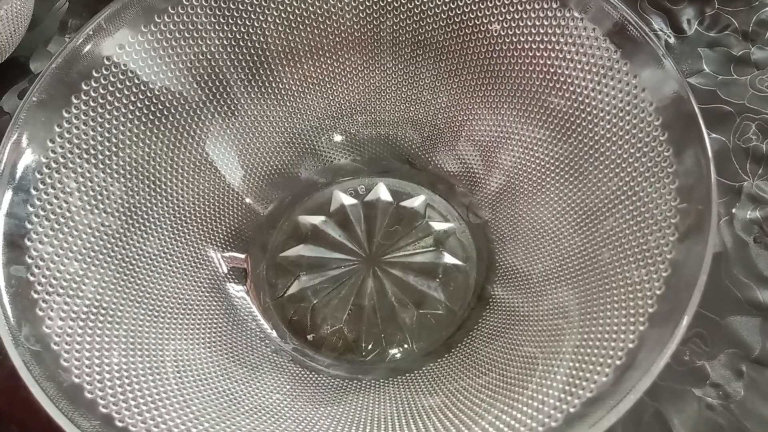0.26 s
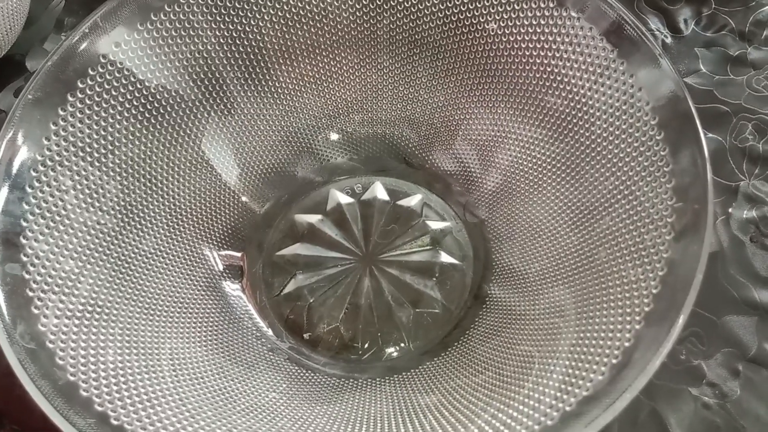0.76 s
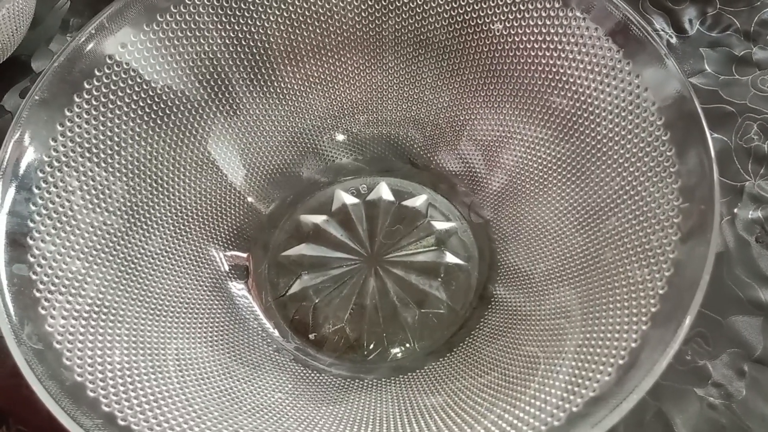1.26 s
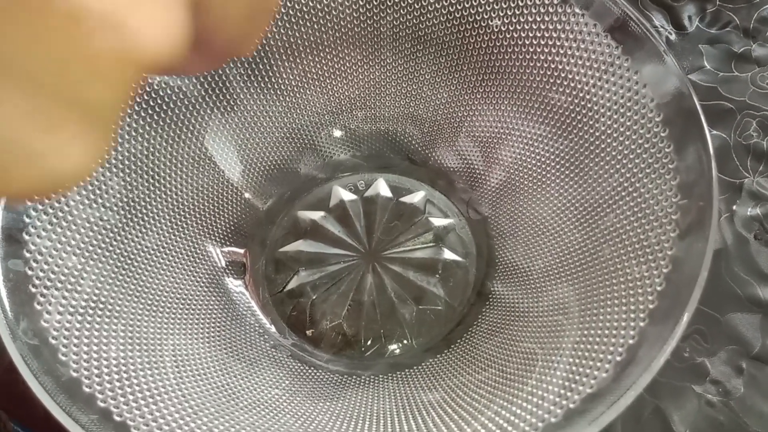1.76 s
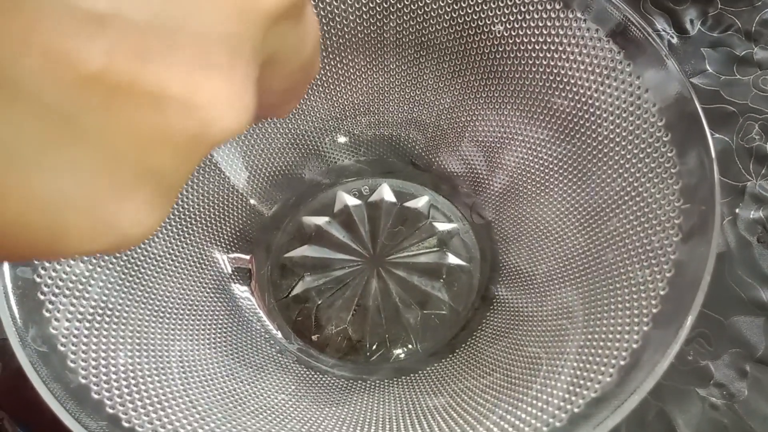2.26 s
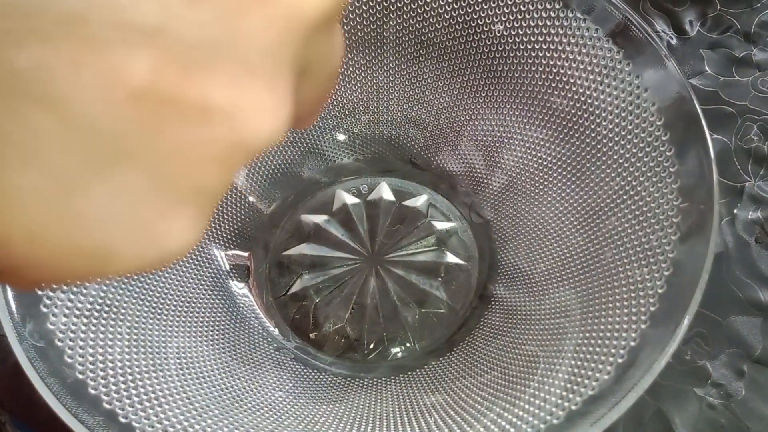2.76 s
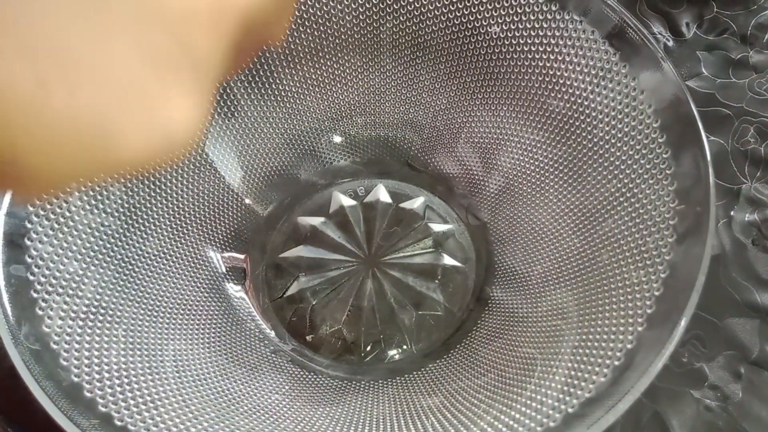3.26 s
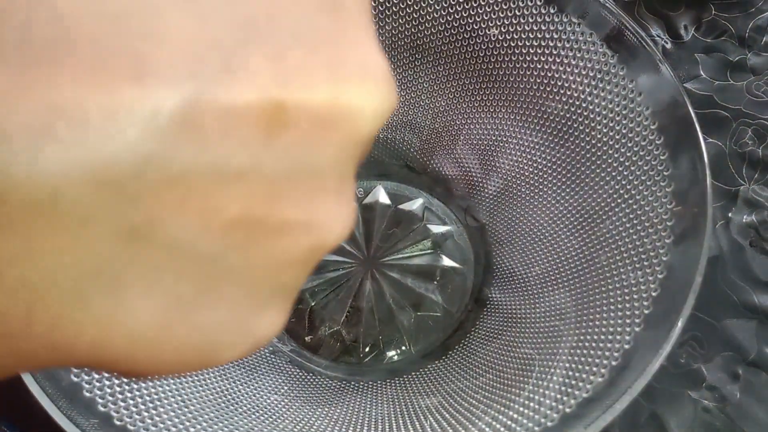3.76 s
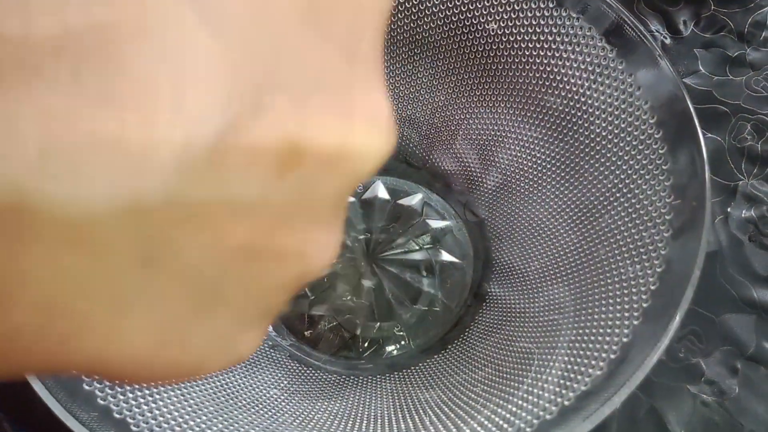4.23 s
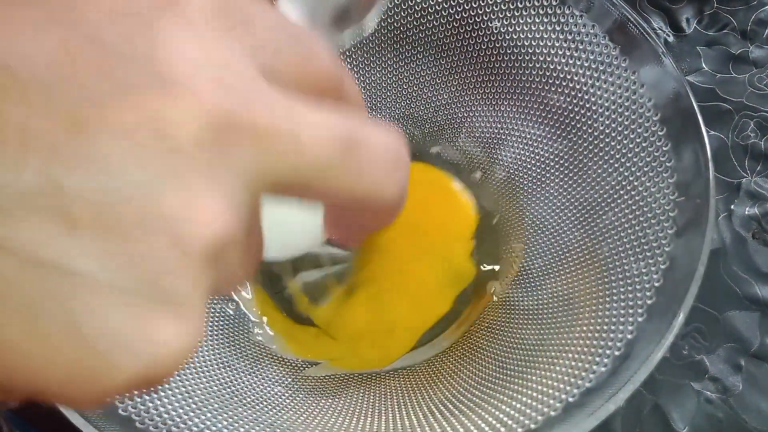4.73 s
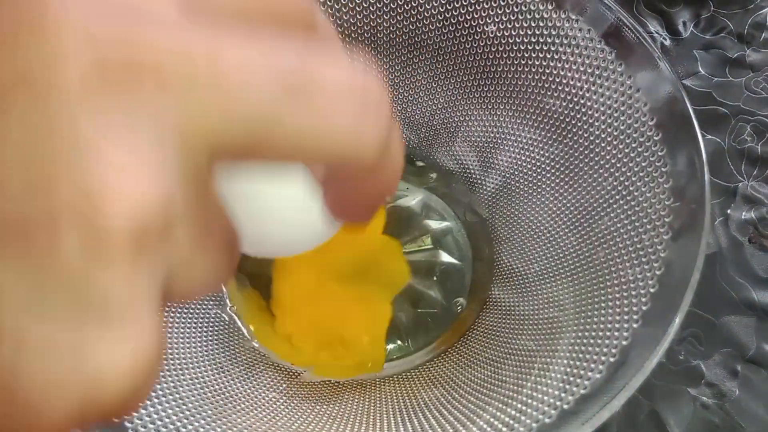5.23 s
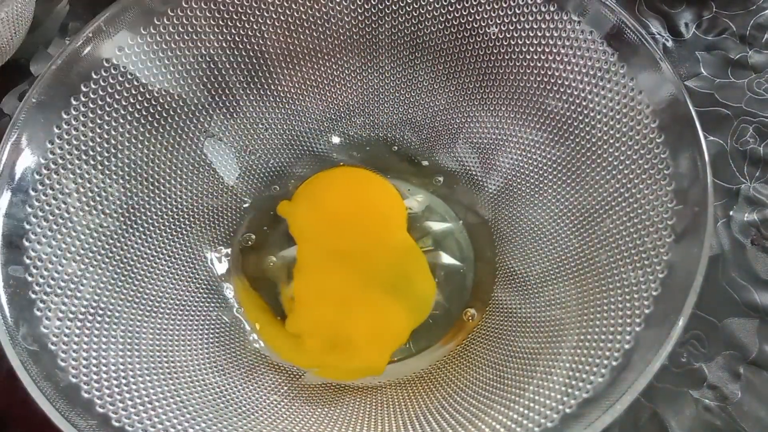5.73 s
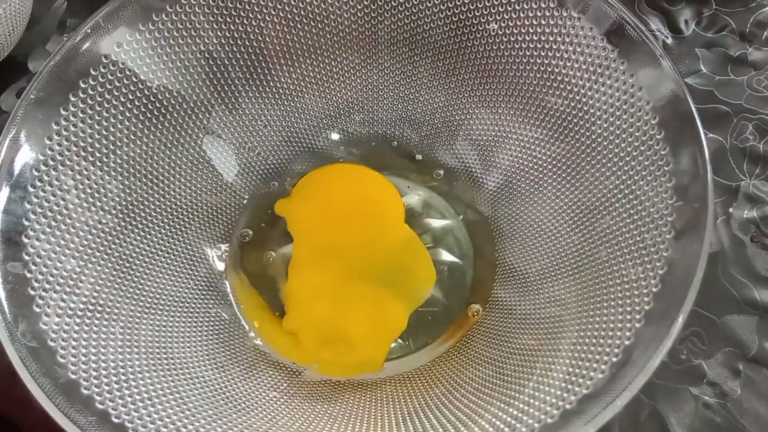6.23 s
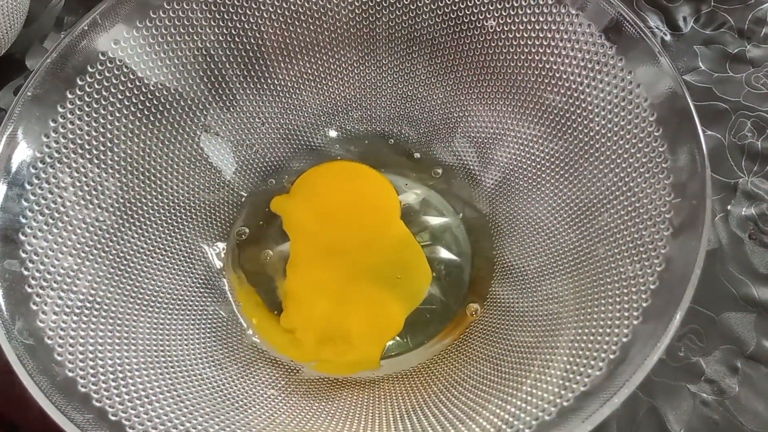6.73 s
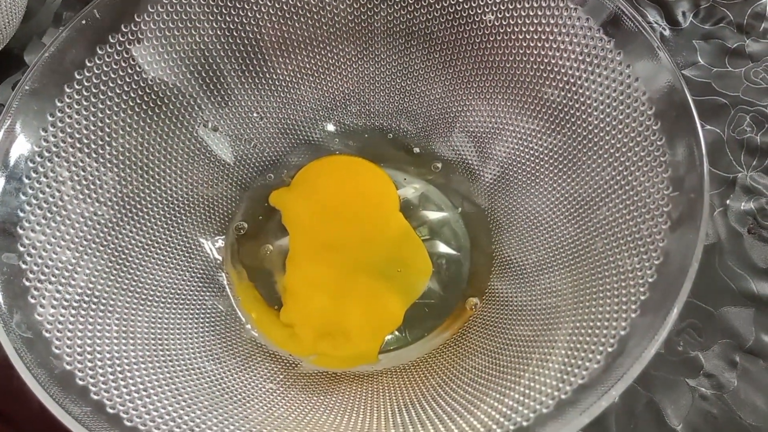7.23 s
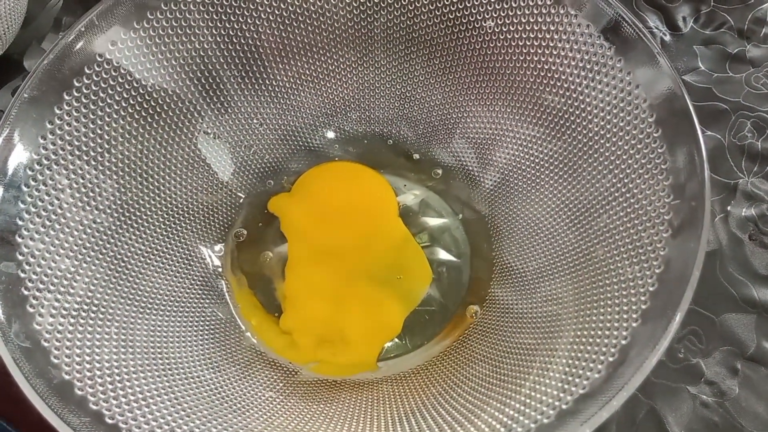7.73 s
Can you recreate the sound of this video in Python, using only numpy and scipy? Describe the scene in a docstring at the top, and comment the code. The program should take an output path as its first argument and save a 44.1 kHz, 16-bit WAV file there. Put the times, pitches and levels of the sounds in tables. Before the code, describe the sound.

A close microphone above a glass bowl catches an egg being opened: a crisp opening tick, tiny brittle cracks, faint hand rumble, then gentle wet plops. Afterwards the shell crackles under squeezing fingers and is put down with a dry, light, rocking clatter. Slight room echo surrounds it, over hollow, uneven background noise with a wavering drone and thin high hiss.

```python
"""Egg opened over a glass bowl

Shell ticks and snaps: noise cracks, ringing bands and a faint song of the bowl; squeezed or rocking shell
crackles in dense clicks. Contents plop softly as damped rising sines; the empty shell is set down with knocks
of damped modes. Hands rumble faintly near the microphone; background noise flickers in patches under a thin
hiss, all filtered noise.
"""
import sys
import numpy as np
from scipy import signal
from scipy.fft import rfft, irfft, next_fast_len
from scipy.io import wavfile
from scipy.ndimage import map_coordinates

SR = 44100
rng = np.random.default_rng(int(sys.argv[2]) if len(sys.argv) > 2 else 0)


def master(y):
    """Save y as 16-bit WAV."""
    cut = np.clip(np.atleast_2d(y).T, -1, 1)
    pcm = np.round(cut * 32767)  # scale
    wavfile.write(sys.argv[1], SR, pcm.astype(np.int16))


N = 352182

# Shell snaps. Each row: start in seconds, ring pitch in Hz, levels of body, ring and splinter in dB.
SNAPS = [(0.0066, 6470, -31.5, -24.5, -28), (1.433, 7300, -63, -47, -46.5), (1.506, 6850, -59, -46.5, -42),
         (1.718, 6330, -54, -35, -37), (2.077, 7000, -68, -55, -47), (2.0895, 7000, -68, -55, -51),
         (2.8255, 6500, -68, -38.5, -43), (2.8375, 5900, -64, -39.5, -34), (2.8512, 6700, -68, -56, -51),
         (2.9417, 7000, -66, -29, -29.5), (2.9512, 5900, -68, -52, -47), (3.0050, 7000, -71, -54, -43),
         (3.3045, 6860, -65, -53, -43.5), (3.3145, 6800, -68, -56, -44), (3.3332, 6500, -59, -42, -43),
         (3.5940, 7600, -70, -42, -40.5), (4.002, 7730, -68, -56, -46), (4.025, 7300, -72, -60, -52),
         (4.0419, 5960, -71, -29, -25), (4.0565, 7150, -61, -48, -37.5), (4.063, 5770, -54, -54, -45),
         (4.11, 6860, -60, -43, -40), (4.232, 6000, -69, -47.5, -69), (4.6606, 6440, -62, -45.5, -53),
         (5.9998, 7130, -52, -36.5, -45), (6.009, 7000, -68, -52, -56), (6.022, 6850, -64, -46, -49),
         (6.0786, 6780, -56, -25, -40), (6.183, 6900, -59, -49, -44), (6.264, 6960, -66, -57, -57),
         (6.375, 7000, -55, -52, -61), (6.655, 5960, -75, -65, -54), (7.331, 5800, -54, -52, -39),
         (7.37, 6000, -53, -56, -51)]
# Splinter spectrum. Each row: frequency in Hz, density in dB per Hz.
SPLINTER_SPECTRUM = [(300, -37), (3000, -20), (4300, -25), (5400, 0.5), (7400, -0.5), (8250, 2.5),
                     (9500, 3), (12300, 2.5), (14400, 8.5), (15300, 7), (16000, -8), (16800, -28)]
# Glass resonances after a snap. Each row: centre in Hz, half-width in Hz, level in dB re splinter.
BOWL_BANDS = [(5160, 130, -22.5), (5750, 180, -15.5)]
BOWL_T60_S = 0.47
SPLIT_ATTACK_S, SPLIT_T60_S, RING_T60_S = 0.0001, 0.008, 0.007
# A crack runs on in small jumps: mean gap, level under the snap, loss per jump, spread.
AFTER_GAP_S, AFTER_LOSS_DB, AFTER_STEP_DB, AFTER_SPREAD_DB = 0.008, 20, 2.5, 3.5

# Shell crackles. Each row: start in seconds, click level in dB, body level in dB, length in seconds.
CRACKLES = [(2.082, -65, -65, 0.056), (2.948, -61, -66, 0.022), (3.336, -52, -66, 0.012),
            (6.054, -48, -61, 0.042), (6.07, -39.5, -44, 0.011), (6.079, -70, -51, 0.042),
            (6.166, -42.5, -49, 0.038), (7.242, -63, -49, 0.02), (7.273, -50, -41.5, 0.025),
            (7.292, -49, -44.5, 0.043), (7.336, -55, -47, 0.03), (7.953, -64.5, -54, 0.049)]
# Treble of a crackle. Each row: frequency in Hz, density in dB per Hz.
GRIT_SPECTRUM = [(3000, -14), (4300, -21), (5050, 4), (5700, 3), (6500, 13), (7300, 12), (8300, 3),
                 (12000, -4), (14500, 6), (15400, 3), (16000, -30)]
# Body of a crackle. Each row: frequency in Hz, density in dB per Hz.
SCUFF_SPECTRUM = [(300, -27), (900, -8), (1400, 2.5), (2300, 1), (3400, -4), (4300, -22), (5100, 1.5),
                  (6500, -22), (12000, -47)]
# Fingers brushing the shell. Each row: start in seconds, length in seconds, level in dB.
BRUSHES = [(0.71, .15, -73), (0.87, .09, -75), (1.328, 0.13, -72), (1.476, 0.11, -65), (2.07, .11, -69),
           (2.21, 0.1, -73), (2.42, 0.085, -73)]
CLICK_SHARE = 0.2  # share of samples that hold a click
CLUMP_SPREAD_DB, CLUMP_S = 2, 0.003

# Low plops. Each row: start in seconds, peak level in dB, starting pitch in Hz.
PLOPS = [(4.486, -38.5, 93), (4.535, -43, 154), (4.572, -45, 158), (4.659, -33, 104), (4.687, -36, 112.5),
         (4.722, -46, 125), (4.792, -43, 85), (4.857, -36, 104), (4.868, -33, 133), (4.912, -41, 104),
         (5.059, -27, 112), (5.132, -48, 72)]
# Air popping in the egg white. Each row: start in seconds, level in dB, starting pitch in Hz.
BUBBLES = [(4.664, -24.5, 2580)]

# Shell set down on the counter. Each row: start in seconds, levels of thud, ring and clack in dB,
# pitch in Hz that the struck spot of the husk favours.
KNOCKS = [(7.2324, -44, -30.5, -32.5, 3600), (7.2675, -30, -25, -24, 1970), (7.2700, -55, -36, -32.5, 5600),
          (7.2759, -37.5, -46, -42, 700), (7.307, -42.5, -34, -38, 1400), (7.331, -44.5, -35.5, -35, 2330)]
# Counter modes. Each row: frequency in Hz, relative level in dB, t60 in seconds.
COUNTER_MODES = [(232, -4.5, 0.078), (352, -7, 0.056), (502, 3.5, 0.027), (600, 9, 0.023), (680, 5, 0.041)]
# Husk modes. Each row: frequency in Hz, relative level in dB, t60 in seconds.
HUSK_MODES = [(1030, 10.5, 0.026), (1380, 7, 0.025), (1970, -5, 0.016), (2360, -5, 0.025),
              (2970, -2, 0.022), (3570, -8, 0.021), (5560, -8, 0.026)]
# Clack spectrum. Each row: frequency in Hz, density in dB per Hz.
CLACK_SPECTRUM = [(400, -19), (1200, -3), (3000, -4.5), (4300, -6), (4950, 3.5), (5700, 5.5), (6900, 3),
                  (8300, -8), (12000, 0.5), (15200, 4), (16000, -22)]
SPOT_LIFT_DB, SPOT_HALF_WIDTH_HZ = 13, 160

# Hand movements. Each row: start in seconds, length in seconds, level in dB.
MOVES = [(0.784, 0.099, -58), (1.203, 0.21, -58), (1.837, 0.16, -62), (2.696, 0.027, -61),
         (2.967, 0.14, -47), (3.26, 0.064, -49.5), (3.948, 0.13, -56), (4.233, 0.43, -57),
         (4.627, 0.31, -52), (5.098, 0.33, -57), (5.907, 0.28, -56), (6.386, 0.035, -61), (7.959, .04, -47)]
# Dull bumps of the hands. Each row: start in seconds, peak level in dB, starting pitch in Hz.
BUMPS = [(3.003, -36, 88.5), (3.055, -44, 75), (3.09, -36, 105), (3.113, -35, 115), (3.259, -41, 80),
         (6.109, -48, 70), (6.158, -41, 75), (6.174, -36.5, 95)]
# Hand rumble spectrum. Each row: frequency in Hz, density in dB per Hz.
RUMBLE_SPECTRUM = [(20, -50), (32, -1), (48, -1.5), (70, 5.5), (110, 4), (205, -4.5), (280, -19),
                   (600, -78)]
MOVE_RISE_S, MOVE_T60_S, RESTING_DB = 0.024, 0.31, -80

# Background noise level. Each row: time in seconds, level in dB before a 0.98 dB cut.
FLOOR_LEVEL = [(0.1, -47.5), (2.3, -48), (2.8, -46), (3.5, -47.5), (4.9, -47), (6.2, -47.5), (6.4, -49.5),
               (7.9, -48.5)]
# Background noise spectrum. Each row: frequency in Hz, density in dB per Hz.
FLOOR_SPECTRUM = [(40, -54), (90, -20.5), (165, -4), (255, -8.5), (320, -8.5), (440, -3), (560, -16.5),
                  (680, -16), (1100, -7.5), (1270, -11), (2000, -4.5), (3100, -9), (3600, -18),
                  (4100, -32.5), (6000, -62)]
# Background noise resonances. Each row: centre in Hz, width in Hz, lift in dB.
FLOOR_RESONANCES = [(822.5, 204, 19), (1072, 43, 8), (1499, 298, 12), (2670, 81, -7)]
# Strong hollow swells. Each row: middle in seconds, level in dB before a 4 dB cut, pitch in Hz.
SWELLS = [(0.178, -47.5, 396), (1.771, -41.5, 331), (1.94, -45.5, 364), (2.67, -49, 734),
          (3.02, -43.5, 329), (3.559, -44.5, 345), (3.679, -44.5, 320), (4.275, -53, 755), (4.48, -47, 423),
          (5.251, -49.5, 358), (5.389, -47, 435), (5.62, -47, 430), (5.79, -48, 313), (6.48, -50, 503),
          (6.83, -46, 323), (6.96, -47, 170), (7.009, -46, 322), (7.19, -42.5, 372), (7.519, -50, 171)]
# Hiss spectrum. Each row: frequency in Hz, density in dB per Hz.
HISS_SPECTRUM = [(2350, 0), (4000, -90), (4210, -15), (4690, -9.5), (5170, -3.5), (5670, 1.5), (6040, 1.5),
                 (6540, 10.5), (7130, 7), (8370, -7.5), (10200, -12), (11100, -19.5), (13500, -13.5),
                 (14700, -11), (15700, -12)]
SWELL_SIGMA_S = 0.024
MURK_DB, MURK_SPREAD_DB, MURK_KNOTS_PER_S = -68, 6.5, 12  # weak random swells
DRONE_WAVER_DB, DRONE_DRIFT_HZ, DRONE_DRIFT_KNOTS_PER_S = 2.5, 34.92, 9
HISS_DB, HISS_TOP_HZ = -59, 15650

# Kitchen decay. Each row: frequency in Hz, t60 in seconds.
KITCHEN_T60 = [(200, 0.23), (1500, 1), (6000, 0.44), (15000, 0.38)]
LOW_CUT_HZ, TOP_HZ = 46.6, 16800


def shell():
    """Each fracture rings the shell briefly and throws a bright tick; the bowl sings faintly after it."""
    out, t = np.zeros(N), np.arange(SR // 3) / SR
    for start_s, ring_hz, body_db, ring_db, splinter_db in SNAPS:
        body = amp(body_db) * burst(band(2790, 140), fade(t, attack_s=0.00054, t60_s=0.0077))
        ring = amp(ring_db) * crack(band(ring_hz, 700), fade(t, SPLIT_ATTACK_S, RING_T60_S))
        # short fracture, then smaller splinters
        split = fade(t, SPLIT_ATTACK_S, SPLIT_T60_S) + 0.18 * fade(t, attack_s=0.00092, t60_s=0.034)
        splinter = amp(splinter_db) * crack(shaped(SPLINTER_SPECTRUM), split)
        snap = body + ring + splinter
        for hz, half_width_hz, db in BOWL_BANDS:
            song = burst(band(hz, half_width_hz), fade(t, attack_s=0.0015, t60_s=BOWL_T60_S))
            snap += amp(splinter_db + db) * song
        delays_s = np.cumsum(AFTER_GAP_S * (0.21 + 1.6 * rng.random(size=5)))
        for k, delay_s in enumerate(delays_s):
            jump_db = splinter_db - AFTER_LOSS_DB - AFTER_STEP_DB * k + rng.normal(0, AFTER_SPREAD_DB)
            add(snap, delay_s, amp(jump_db) * crack(shaped(SPLINTER_SPECTRUM), split[:SR // 100]))
        add(out, start_s, in_kitchen(snap, wet_db=-16.0))
    return out


def crackle():
    """Squeezed or rocking shell crackles in tiny bright clicks over a duller scuff; fingers brush it."""
    out = np.zeros(N)
    for start_s, click_db, body_db, length_s in CRACKLES:
        grit = amp(click_db) * clicking(shaped(GRIT_SPECTRUM), length_s)
        scuff = amp(body_db) * clicking(shaped(SCUFF_SPECTRUM), length_s)
        add(out, start_s, in_kitchen(grit + scuff, wet_db=-6.5))
    for start_s, length_s, db in BRUSHES:
        add(out, start_s, amp(db) * clicking(band(13900, 1600), length_s))
    return out


def clicking(gain, length_s):
    """A swell of dense tiny clicks in uneven clumps, rms 1."""
    size = int(length_s * SR)
    clumps = np.repeat(rng.standard_normal(size), int(CLUMP_S * SR))[:size]
    clicks = rng.laplace(size=size) * (rng.random(size) < CLICK_SHARE)
    clicks *= amp(CLUMP_SPREAD_DB * np.clip(clumps, -1.5, 1.5))
    return unit(filtered(clicks * signal.windows.tukey(size, 0.8), gain))


def contents():
    """White and yolk land in low plops; a trapped bubble pops as a short rising sine."""
    out, t = thumps(PLOPS), np.arange(SR // 5) / SR
    for start_s, db, hz in BUBBLES:
        tone = np.sin(2 * np.pi * hz * t * (1 + 0.5 * t))
        pop = amp(db) * tone * fade(t, attack_s=0.0023, t60_s=0.026)
        add(out, start_s, in_kitchen(pop, wet_db=-13))
    return out


def thumps(rows):
    """Soft heavy contacts: each is one low, heavily damped push that stiffens as it presses."""
    out, t = np.zeros(N), np.arange(SR // 5) / SR
    for start_s, peak_db, hz in rows:
        envelope = fade(t, attack_s=0.0037, t60_s=0.059) ** 2  # squaring halves the decay time
        push = -np.sin(2 * np.pi * hz * t * (1 + 9 * t)) * envelope
        add(out, start_s, amp(peak_db) * push / np.abs(push).max())
    return out


def knocks():
    """The empty shell lands and rocks: counter thud, dry clack, husk modes weighted by the struck spot."""
    out, t = np.zeros(N), np.arange(SR // 3) / SR
    for start_s, thud_db, ring_db, clack_db, spot_hz in KNOCKS:
        thud = amp(thud_db - 1.5) * burst(band(218, 60), fade(t, attack_s=0.002, t60_s=0.31))
        counter = amp(thud_db + 1.5) * ringing(COUNTER_MODES, t)
        spot = band(spot_hz, SPOT_HALF_WIDTH_HZ)
        modes = [(hz, db + SPOT_LIFT_DB * spot(hz), t60_s) for hz, db, t60_s in HUSK_MODES]
        husk = amp(ring_db) * ringing(modes, t)
        clack = amp(clack_db) * burst(shaped(CLACK_SPECTRUM), fade(t, attack_s=0.00072, t60_s=0.016))
        add(out, start_s, in_kitchen(thud + counter + husk, wet_db=-10))
        add(out, start_s, in_kitchen(clack, wet_db=-14.5))
    return out


def ringing(modes, t):
    """Damped modes that start together, struck at slightly new strengths each time."""
    total = np.zeros(len(t))
    for hz, db, t60_s in modes:
        strength = amp(db + rng.normal(0, 1.9))
        total += strength * fade(t, 0.00076, t60_s) * np.cos(2 * np.pi * hz * t)
    return strike(total)


def hands():
    """Moving hands rumble close by: each movement rises, holds unevenly and dies away; some bumps."""
    t, motion = np.arange(N) / SR, np.zeros(N)
    for start_s, length_s, db in MOVES:
        rise = np.clip((t - start_s) / MOVE_RISE_S + 0.5, 0, 1)
        decay = np.exp(-np.log(1000) * np.maximum(t - start_s - length_s, 0) / MOVE_T60_S)
        motion += amp(db) * rise * decay
    level = (amp(RESTING_DB) + motion) * amp(2.1 * wobble(20))
    return level * noise(shaped(RUMBLE_SPECTRUM), N) + thumps(BUMPS)


def background():
    """Hollow background noise that flickers and swells, a wavering narrow drone in it, a thin hiss above."""
    time_s, level_db = np.transpose(FLOOR_LEVEL)
    floor_db = np.interp(np.arange(N) / SR, time_s, level_db)
    floor = amp(floor_db - 0.98) * flickering(hollow, patchy_db=5.5, patch_hz=114.9, patch_s=0.045)
    drone_hz = DRONE_DRIFT_HZ * wobble(DRONE_DRIFT_KNOTS_PER_S)
    drone = drifting(noise(band(875.0, 54.6), N), drone_hz)
    drone *= amp(floor_db - 6.5 + DRONE_WAVER_DB * wobble(13))
    hiss = amp(HISS_DB) * flickering(thin, patchy_db=4.0, patch_hz=131.7, patch_s=0.064)
    return floor + drone + swelling() + hiss


def hollow(hz):
    """Background noise gain: broad spectrum plus resonances in dB."""
    lift_db = sum(db / (1 + (2 * (hz - centre) / width) ** 2) for centre, width, db in FLOOR_RESONANCES)
    return amp(along(FLOOR_SPECTRUM, hz) + lift_db)


def thin(hz):
    """Hiss gain, cut at its top."""
    return amp(along(HISS_SPECTRUM, hz)) * (hz < HISS_TOP_HZ)


def swelling():
    """Hollow swells: strong ones of one shape, each at its own pitch, over weak random ones."""
    out = amp(MURK_DB + MURK_SPREAD_DB * wobble(MURK_KNOTS_PER_S)) * noise(band(361.0, 74), N)
    t = np.arange(-SR // 8, SR // 8) / SR
    bell = np.exp(-0.5 * (t / SWELL_SIGMA_S) ** 2)
    bell_rms = np.sqrt(np.mean(bell ** 2))
    for middle_s, db, hz in SWELLS:
        swell = unit(bell * noise(band(hz, 46.7), len(t))) * bell_rms
        add(out, middle_s + t[0], amp(db - 4.0) * swell)
    return out


def flickering(gain, patchy_db, patch_hz, patch_s):
    """Coloured noise of rms 1 whose level wanders in small patches of time and frequency."""
    hz, t, z = signal.stft(rng.standard_normal(N), SR, nperseg=1024, noverlap=768)
    grid = np.meshgrid(hz / patch_hz, t / patch_s, indexing="ij")
    field = map_coordinates(rng.standard_normal((400, 400)), grid, order=2, mode="wrap")
    z = z * amp(patchy_db * np.clip(field, -2, 2))
    patches = signal.istft(z, SR, nperseg=1024, noverlap=768)[1]
    return unit(filtered(patches[:N], gain))


def drifting(x, shift_hz):
    """x with its spectrum shifted by a curve in Hz."""
    analytic = signal.hilbert(x, next_fast_len(N))[:N]
    return (analytic * np.exp(2j * np.pi * np.cumsum(shift_hz) / SR)).real


def in_kitchen(x, wet_db):
    """A sound with its echo: two near walls, then a tail that rings longest in the mids."""
    hz, t, z = signal.stft(rng.standard_normal(SR // 2), SR, nperseg=256)
    decay = amp(-60 * t / along(KITCHEN_T60, hz)[:, None])
    tail = signal.istft(z * decay, SR, nperseg=256)[1]
    tail = np.pad(tail / np.linalg.norm(tail), (SR // 200, 0))
    for delay_s, gain in [(0.0092, 0.33), (0.0135, 0.36)]:
        tail[round(delay_s * SR)] += gain
    response = amp(wet_db) * tail
    response[0] = 1  # direct sound
    return signal.fftconvolve(x, response)


def crack(gain, envelope):
    """A short burst of noise ringing through a causal (minimum-phase) colour."""
    size = len(envelope)
    cepstrum = irfft(np.log(np.maximum(gain(np.fft.rfftfreq(size, 1 / SR)), 1e-4)), size)
    cepstrum[1:size // 2] *= 2
    cepstrum[size // 2 + 1:] = 0
    spectrum = rfft(rng.standard_normal(size) * envelope)
    return strike(irfft(spectrum * np.exp(rfft(cepstrum)), size))


def burst(gain, envelope):
    """A short burst of coloured noise."""
    return strike(noise(gain, len(envelope)) * envelope)


def strike(x):
    """x scaled to the energy of 5 ms at rms 1."""
    return x * np.sqrt(0.005 * SR) / np.linalg.norm(x)


def fade(t, attack_s, t60_s):
    """A quick rise and an exponential decay."""
    return (1 - np.exp(-t / attack_s)) * np.exp(-np.log(1000) * t / t60_s)


def noise(gain, size):
    """Coloured noise of rms 1."""
    return unit(filtered(rng.standard_normal(size), gain))


def filtered(x, gain):
    """x times a gain that depends on frequency."""
    m = next_fast_len(len(x) + 4096)
    return irfft(rfft(x, m) * gain(np.fft.rfftfreq(m, 1 / SR)), m)[:len(x)]


def shaped(points):
    """Gain function of a (Hz, dB) spectrum."""
    return lambda hz: amp(along(points, hz))


def band(centre_hz, half_width_hz):
    """Gain function of a steep-sided resonance, one half at half_width_hz off centre."""
    return lambda hz: 1 / (1 + ((hz - centre_hz) / half_width_hz) ** 4)


def along(points, hz):
    """(Hz, value) points read on a log axis."""
    f, v = np.transpose(points)
    return np.interp(np.log(hz + 1), np.log(f + 1), v)


def wobble(knots_per_s):
    """A smooth random curve."""
    knots = rng.standard_normal(int(N * knots_per_s / SR) + 4)
    return map_coordinates(knots, [np.arange(N) * knots_per_s / SR])


def amp(db):
    """Decibels to gain."""
    return 10 ** (np.asarray(db) / 20)


def unit(x):
    """x at rms 1."""
    return x / np.sqrt(np.mean(x ** 2) + 1e-20)


def add(track, start_s, sound):
    """Mix a sound into the track in place."""
    part = track[max(round(start_s * SR), 0):][:len(sound)]
    part += sound[:len(part)]


def scene():
    """Everything reaches one microphone above the bowl."""
    return (shell() + crackle() + contents() + knocks() + hands() + background())[None]


def record(dry):
    """The microphone loses the deepest bass; nothing passes above the band limit."""
    low_cut = signal.butter(3, LOW_CUT_HZ, "highpass", fs=SR, output="sos")
    return np.array([filtered(signal.sosfilt(low_cut, x), lambda hz: hz < TOP_HZ) for x in dry])


dry = scene()
out = record(dry)
master(out)
```